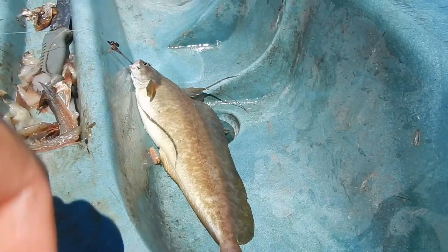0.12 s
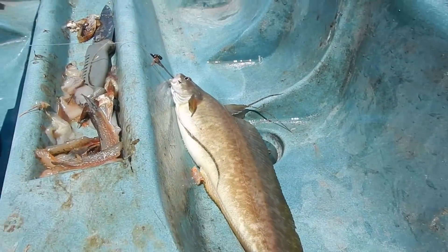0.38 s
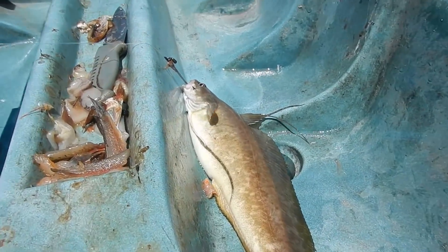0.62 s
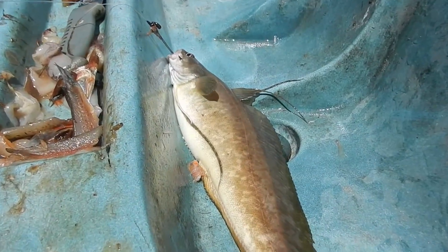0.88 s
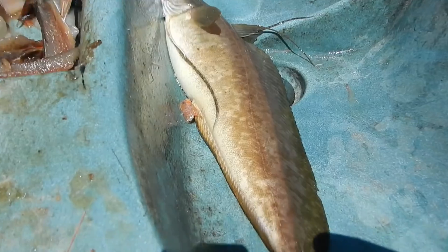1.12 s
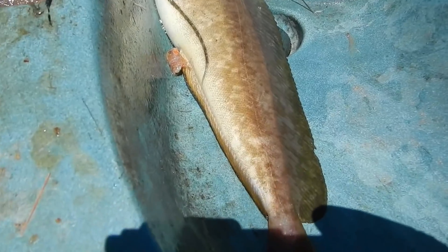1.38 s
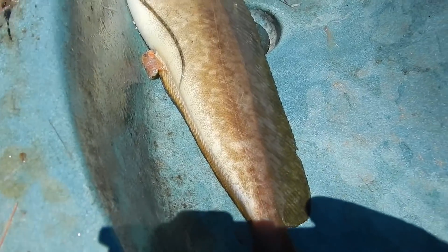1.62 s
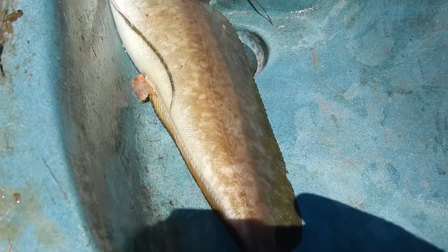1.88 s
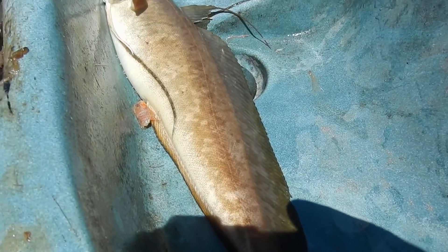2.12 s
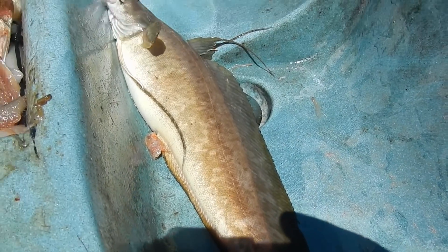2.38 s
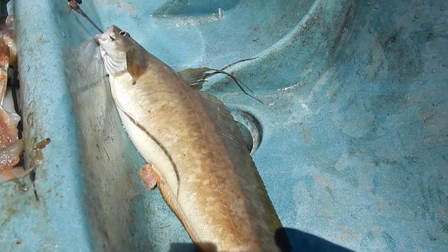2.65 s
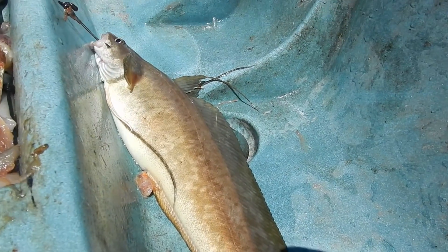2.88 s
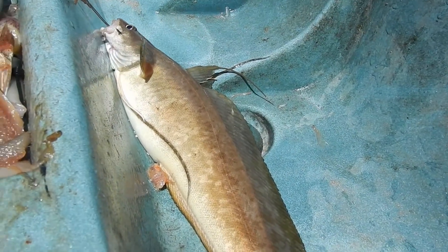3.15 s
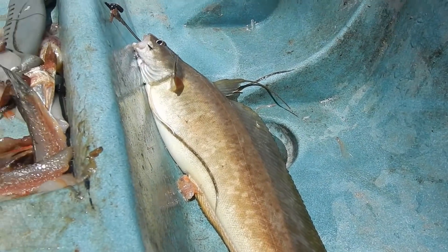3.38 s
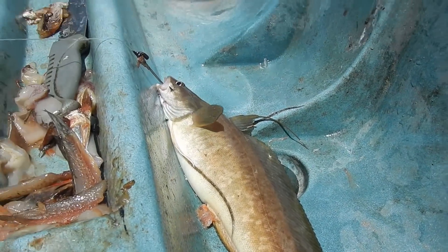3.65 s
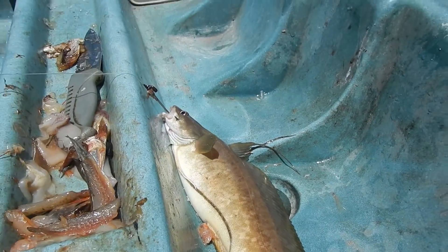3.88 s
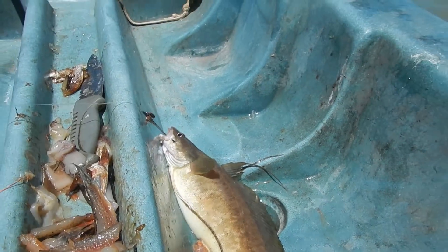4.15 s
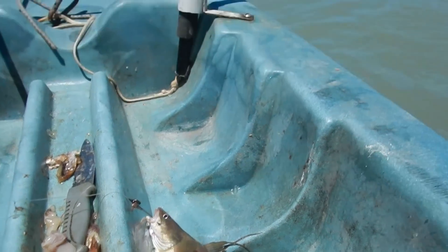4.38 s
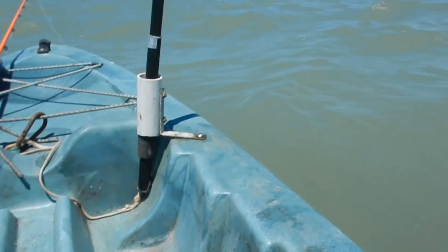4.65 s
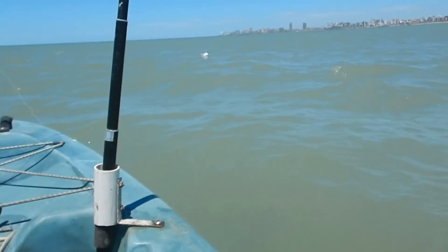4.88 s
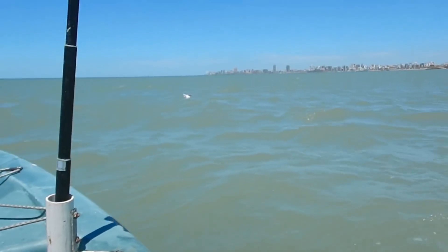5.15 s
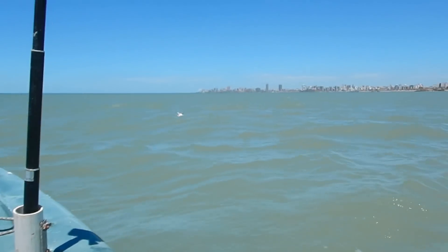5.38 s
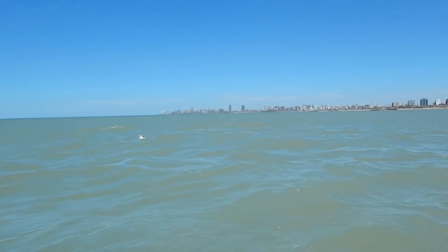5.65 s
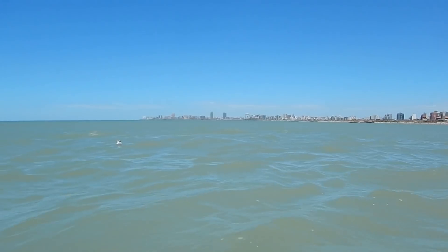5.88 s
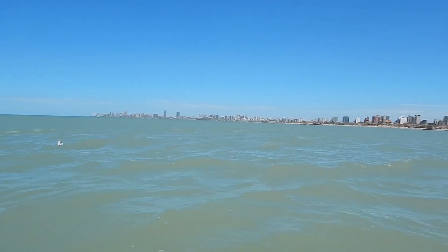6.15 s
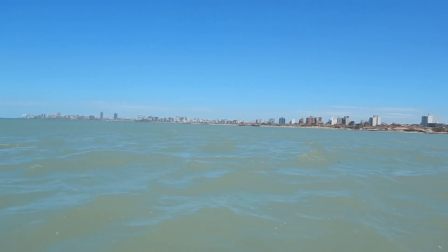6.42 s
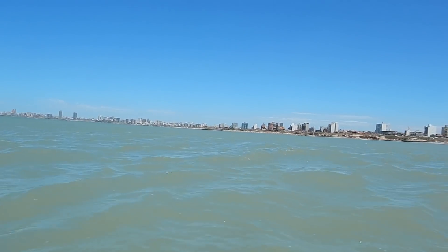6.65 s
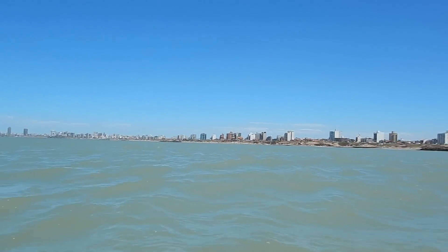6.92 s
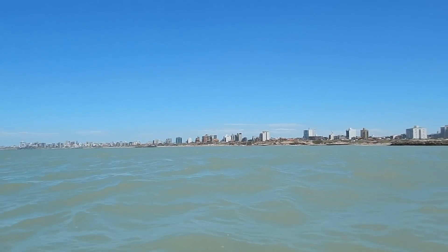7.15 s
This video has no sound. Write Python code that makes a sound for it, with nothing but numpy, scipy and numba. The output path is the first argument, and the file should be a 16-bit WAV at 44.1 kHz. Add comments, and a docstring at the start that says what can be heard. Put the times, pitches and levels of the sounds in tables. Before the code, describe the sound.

Outdoors on the sea, a small handheld stereo camera sits low in a plastic kayak. From 0 to 4 seconds it is quiet: a dull, surging swell rumble in the hull, faint trickle and light hiss, scattered tiny ticks. Soft hollow knocks come near 0.2, 0.3, 1.2 and 1.7, with a stronger double thud at 2.3 and more at 3.4 and 3.7. Pitched bubbles plop, clustering from 3.3 to 4. Around 4.4 a last low knock sounds and ticks thicken. From 4.7 sharp clicks and fizzy, gurgling splashes swell, leaning left. From 5 wind hits the microphones in irregular low buffets, rasps and thumping slaps, strongest about 5.1 to 6.4, shifting between sides. At 6.7 a loud, brief rising bubble plop joins another splash and slap; then wind weakens, leaving scattered gusts, wet ticks, wash and small plops until 7.3.

```python
"""A small camera in a plastic kayak on the open sea. At first swell rumbles in the hull and knocks on it (noise,
ringing hull modes), while water trickles, ticks and bubbles along the side (filtered noise, bursts, gliding tones).
Then the camera lifts out of shelter: the wash of fizz and gurgle grows, splashes and ticks crowd in, and wind
buffets, rasps and slaps at both microphone ports (gusty noise and short pushes) over a deep flutter of breeze."""
import sys
import numpy as np
from scipy import signal
from scipy.fft import rfft, irfft
from scipy.io import wavfile
from scipy.ndimage import uniform_filter1d, map_coordinates
from numba import njit

SR = 44100
rng = np.random.default_rng(int(sys.argv[2]) if len(sys.argv) > 2 else 0)


def put_to_file(sound):
    """Save the sound as 16-bit audio at rate SR, in the file named by the first command-line argument."""
    columns = np.atleast_2d(sound).T  # one column per channel
    safe = np.clip(columns, -1, 1)
    whole_steps = np.round(safe * 32767)
    wavfile.write(sys.argv[1], SR, whole_steps.astype(np.int16))


def undo_db(level):
    """Turn decibels back into plain size, where 20 dB means ten times bigger."""
    steps = np.asarray(level, float) / 20
    return 10 ** steps


N = 321048
T = np.arange(N) / SR

# Steady wind on the ports. Each row: time in seconds, level in dB.
STEADY_WIND = [(4.2, -71), (4.8, -50.5), (5.1, -26.5), (5.3, -34), (5.55, -27), (5.72, -31), (6, -25),
               (6.3, -35), (6.6, -29.5), (7, -38.5), (7.28, -30)]
# Gusts over the steady wind. Each row: centre in seconds, buffet level in dB, length in seconds.
GUSTS = [(4.91, -25, .042), (4.965, -23.5, 0.041), (5.037, -23.5, .099), (5.174, -19, 0.2),
         (5.24, -29, .02), (5.346, -22.5, 0.02), (5.413, -15.5, 0.031), (5.464, -16.5, 0.14),
         (5.517, -13.5, 0.033), (5.58, -15, 0.028), (5.63, -14.5, 0.077), (5.764, -22, 0.019),
         (5.818, -19, 0.042), (5.863, -20, 0.055), (5.962, -20.5, 0.13), (6.065, -13.5, 0.099),
         (6.166, -25, 0.089), (6.245, -23.5, 0.049), (6.352, -12, 0.082), (6.443, -22.5, 0.074),
         (6.509, -21.5, .029), (6.573, -27, .02), (6.67, -18, 0.05), (6.721, -25, 0.015),
         (6.772, -15.5, 0.019), (6.932, -23, 0.026), (7.085, -33.5, 0.059), (7.136, -20.5, 0.017),
         (7.187, -23, 0.018)]
# Tone of the low buffeting. Each row: frequency in Hz, relative gain in dB.
BUFFET_COLOUR = [(41, -50), (70, -16.5), (156, 6.5), (231, 2), (270, 1.5), (306, 1), (373, -2.5),
                 (600, -21), (780, -21), (1320, -120)]
# Tone of the brighter rasp. Each row: frequency in Hz, relative gain in dB.
RASP_COLOUR = [(250, -23), (450, 2.5), (800, -4), (1200, -9.5), (2000, -22.5), (3000, -33.5), (4500, -53)]
# Sharp slaps of wind. Each row: start in seconds, peak in dB before panning.
SLAPS = [(5.061, -12.5), (5.155, -4.5), (5.204, -12.5), (5.402, -18.5), (5.578, -12), (5.628, -4.5),
         (5.969, -10), (6.024, -14), (6.064, -8.5), (6.09, -15), (6.319, -7), (6.329, -6), (6.375, -5),
         (6.426, -14.5), (6.717, -14)]
# Deep flutter of the breeze. Each row: time in seconds, level in dB before its random wander.
BREEZE = [(0, -46.5), (.38, -42), (.69, -57), (1.64, -49), (1.74, -60), (2.13, -69), (2.41, -44.5),
          (3.85, -43.5), (4.1, -49), (4.45, -44), (4.62, -60), (5.21, -44), (5.49, -39), (5.74, -49.5),
          (5.9, -36.5), (7.28, -46)]
# Tone of the breeze. Each row: frequency in Hz, relative gain in dB.
BREEZE_COLOUR = [(15, -38.5), (30, -28.5), (50, -4), (75, -4), (100, -6.5), (140, -14.5), (250, -69.5)]
# Slow wash along the side. Each row: time in seconds, fizz level in dB, gurgle over fizz in dB.
WASH = [(0, -56.5, 4), (.55, -56, 4.5), (.94, -52.5, 2.5), (1.07, -62, 6.5), (1.7, -62.5, 6), (1.8, -56, 3),
        (2.1, -61.5, 5), (2.25, -67, 10), (2.62, -61.5, 4.5), (3.5, -64, 10), (3.97, -50.5, 3),
        (4.62, -48.5, 9.5), (4.87, -35, 0), (5.33, -32, -0.5), (5.62, -44.5, 7.5), (6.05, -46, 1.5),
        (6.2, -45, -4.5), (6.6, -49, 1.5), (6.77, -40, 0.5), (6.95, -34.5, 0), (7.01, -47.5, 3.5)]
# Wavelets breaking over the wash. Each row: centre in seconds, fizz in dB, length in seconds, gurgle over fizz in dB.
SPLASHES = [(0.172, -59.5, 0.017, 12), (0.339, -55, 0.066, 11.5), (1.459, -72, 0.053, 19),
            (1.73, -69.5, 0.043, 16), (1.999, -67.5, 0.054, 18), (2.306, -63, 0.11, 12),
            (2.918, -66.5, .08, 9.5), (3.276, -63, .04, 14), (3.388, -58, 0.069, 14.5),
            (3.521, -63, .08, 11.5), (3.731, -56, 0.12, 15), (4.714, -48, .08, -7),
            (5.069, -30, 0.036, -3.5), (5.208, -31.5, 0.11, 0.5), (5.445, -34, 0.073, -9),
            (5.817, -35.5, 0.15, -6), (6.69, -38, 0.091, 6)]
# Place of the wash in stereo. Each row: time in seconds, fizz left minus right in dB,
# delay of the fizz at the right port in samples, gurgle left minus right in dB.
BEARING = [(0, -2, 1.1, -5.5), (3.5, -2, 1.4, -7), (3.9, -3.5, 1.4, -7), (4.7, -10.5, 1.4, -2),
           (5.05, -7, 1.17, 0.5), (6, -6.5, 1.2, 0), (6.5, 0, .6, -1.5)]
# Tone of bursting foam. Each row: frequency in Hz, relative gain in dB.
FIZZ_COLOUR = [(2800, -15), (3300, -8.5), (3800, -25), (4400, -10), (5300, -1), (5700, -1), (7000, -10),
               (8500, -11.5), (11000, -16.5), (16000, -21.5)]
# Tone of the larger bubbles. Each row: frequency in Hz, relative gain in dB.
GURGLE_COLOUR = [(440, -33.5), (750, -4), (912, -7), (1050, -4), (1990, -2.5), (2480, -4.5), (2960, -8),
                 (3400, -18.5), (4000, -25.5), (5200, -38), (8800, -120)]
# Ticks of drops and gear. Each row: start in seconds, overall gain in dB, body gain in dB, snap gain in dB,
# the last two on top of the overall gain.
TICKS = [(0.1475, -37.5, 0, -9), (0.3165, -47, 8, -9), (0.381, -42, -6, -9), (0.7035, -39, 2, -9),
         (0.9367, -41, 6, -9), (1.1104, -53, 18.5, -9), (1.3708, -44, -2, -3), (1.6477, -38.5, 5, -8),
         (1.7595, -35, -5, -3), (1.7873, -35, -8, -9), (1.8554, -33, -3, -4), (2.276, -44, 2, -7),
         (3.4286, -47, 10, 2), (3.495, -47, 11, 4), (3.5326, -45, -2, -3), (3.665, -41, 12, -9),
         (3.8471, -31.5, -6, -9), (4.145, -29.5, -12, -9), (4.215, -29.5, -1, -10), (4.3222, -28, 4, -3),
         (4.4068, -28, -4, -9), (4.59, -29, -11, -9), (4.629, -32.5, -8, -9), (4.6752, -29, -14, -3),
         (4.7057, -23, -12, 2), (4.7306, -13, -19, -2), (4.78, -22, -20, -6), (4.8678, -19, -4, -12),
         (4.9117, -14, -14.5, -13), (4.9746, -13, -22, 2), (5.176, -17.5, -9, -12), (5.298, -12, -17, -12),
         (5.315, -9.5, -24, 3), (5.3258, -19, -17.5, 6.5), (5.408, -19, -13, -3), (5.4375, -13, -31, -7),
         (5.518, -20.5, -17.5, -12), (5.671, -24, -26, -8), (5.7002, -21.5, -17, -9),
         (5.7623, -21, -14, -8), (5.812, -13.5, -25, 2), (5.837, -16.5, -5, 4), (6.0222, -28, 4.5, 4),
         (6.178, -15, -9.5, -5), (6.195, -12.5, -6, -3), (6.2181, -21.5, -19.5, -4), (6.2296, -23, -3, -8),
         (6.2973, -26.5, -5, 8), (6.3162, -29, 1, 10.5), (6.439, -29.5, -19.5, -11),
         (6.548, -25.5, -20, -8), (6.608, -28, -1, -12), (6.686, -14.5, 4.5, 2), (6.72, -18.5, -12.5, 8),
         (6.738, -20, -16, -7), (6.7717, -33, -12.5, 12), (6.799, -21.5, -8, -2.5), (6.833, -18.5, -1, -6),
         (6.915, -17.5, -6, -9), (6.9445, -15, -3, -9), (7.001, -30, -12.5, 12.5), (7.0693, -30.5, -17, 10),
         (7.122, -24.5, -23, 7), (7.1348, -14.5, -11, -1.5)]
# Single bubbles. Each row: start in seconds, peak in dB before panning, first pitch in Hz, final over first pitch.
BUBBLES = [(.015, -46.5, 2830, 1.02), (0.074, -36.5, 1030, 1.05), (.088, -38.5, 2100, 1.2),
           (.15, -39, 2150, 1.1), (.3, -42, 1890, 1.2), (.567, -46, 1900, 1.2), (.698, -45, 1870, 1.1),
           (.148, -32.5, 1050, 0.93), (0.413, -34, 897, 0.66), (1.419, -32, 1180, 1.25),
           (1.425, -39.5, 1890, 0.66), (1.465, -46, 1900, 0.88), (1.73, -42, 2370, 1.05),
           (1.773, -36, 2440, 1.1), (1.854, -47, 2080, 1.02), (1.965, -46.5, 1880, 0.94),
           (2.893, -38, 1050, 0.94), (3.1, -45.5, 1350, 0.91), (3.2, -45, 1590, 1.1),
           (3.139, -38, 1344, 0.93), (3.332, -32.5, 1090, 0.92), (3.38, -33, 1500, 1.2),
           (3.395, -36, 2230, 0.91), (3.505, -46, 1350, 1.2), (3.535, -31.5, 740, 0.9),
           (3.553, -43, 1530, 1.01), (3.613, -30.5, 2420, 1.16), (3.716, -28, 1260, .83),
           (3.775, -41, 2970, 1.1), (3.786, -30.5, 1080, 1.3), (3.812, -33.5, 2000, 0.97),
           (3.904, -40, 2370, 0.92), (3.97, -44, 1880, 1.05), (4.294, -31, 1293, 0.84),
           (5.711, -28, 906, 1.7), (6.176, -24, 2300, 1.5), (6.539, -25.5, 854, 4), (6.688, -5, 1980, 1.5),
           (6.79, -24.5, 870, 4), (6.832, -26, 1493, 2), (6.926, -22, 1297, 1.1), (6.955, -31, 1900, 1.1),
           (7.13, -20, 934, 1.1)]
# Knocks on the hull. Each row: start in seconds, strength in dB, centre of the excited modes in Hz.
KNOCKS = [(.149, -32, 400), (.311, -28.5, 606), (1.195, -26.5, 500), (1.626, -36, 250), (1.739, -26.5, 347),
          (1.97, -32.5, 500), (2.274, -18, 335), (2.305, -27, 218), (2.893, -31.5, 895), (3.37, -33, 806),
          (3.402, -21.5, 460), (3.719, -21, 300), (4.341, -27, 500), (4.409, -21, 388)]
# Modes of the hull. Each row: frequency in Hz, relative strength in dB.
HULL = [(160, 11), (205, 6.5), (270, -10.5), (335, -7), (435, -4), (550, -3), (680, -4), (850, -42),
        (1050, -7)]
# Tone of the water thrown up by a knock. Each row: frequency in Hz, relative gain in dB.
SLOSH_COLOUR = [(300, -33.5), (600, 12.5), (1200, 4), (2400, -30.5), (4000, -30), (5500, -18.5),
                (8000, -66)]
# Swell in the hull. Each row: time in seconds, level in dB before its random surge.
SWELL = [(0, -35), (.57, -37), (1.39, -35), (2.74, -34.5), (3.58, -32.5), (4.13, -35), (4.37, -31),
         (4.75, -33.5)]
# Tone of the swell. Each row: frequency in Hz, relative gain in dB.
SWELL_COLOUR = [(35, -45), (60, -33.5), (129, -6.5), (219, 0.5), (304, -6), (428, -7), (789, -19.5),
                (990, -30.5), (1240, -30), (1800, -41.5), (2340, -59.5), (3960, -120)]
# Tone of the camera's hiss. Each row: frequency in Hz, relative gain in dB.
HISS_COLOUR = [(2000, -6.5), (4000, -1), (9000, -8.5), (12000, -10), (15500, -7.5)]
# Treble loss of the microphone. Each row: frequency in Hz, gain in dB.
MICROPHONE = [(6500, -0.5), (8000, -8.5), (9500, -17), (11000, -26), (13500, -37.5), (16000, -41)]
# Narrow bands taken out by the camera. Each row: centre in Hz, width in Hz.
NOTCHES = [(2500, 190), (5000, 60), (7500, 60)]

RASP_DB, RASP_FADE_DB_PER_S = -7, -4  # rasp over buffet in a gust at 5.5 s, dulling as the ports turn
GUST_PAN_DB, SLAP_PAN_DB = 4.5, 13  # random spread of left minus right
TICK_HZ, TICK_SPREAD = 5550, 0.046  # ring pitch and its spread in natural log
SNAP_FADE_S = 0.0056  # an extra 60 dB of fading for the bright first instant of contact
STRAY_TICK_DB, STRAY_SPREAD_DB = 11, 1.5  # lesser ticks: gain over the fizz and its spread
STRAY_BODY_DB, STRAY_SNAP_DB = -7.5, -3
BUBBLE_CYCLES, CYCLES_LOST_PER_DB = 43, 1.67  # ringing at -37 dB; hard plops are cut shorter
RISING_LASTS = .5  # power of the pitch rise by which a rising bubble rings longer
KNOCK_T60_S = 0.1  # at 300 Hz
HISS_DB = -71


def unit(x):
    """Scale to rms 1."""
    return x / np.sqrt(np.mean(x ** 2))


def colour(x, table, size=2048):
    """Causal minimum-phase filter through (Hz, dB) points, its phase taken from the folded cepstrum."""
    hz, db = np.transpose(table)
    f = np.maximum(np.arange(size // 2 + 1), 1e-3) * SR / size
    cepstrum = irfft(np.log(undo_db(np.interp(np.log(f), np.log(hz), db))))
    cepstrum[1:size // 2] *= 2
    cepstrum[size // 2 + 1:] = 0
    taps = irfft(np.exp(rfft(cepstrum)))
    taps = taps.reshape((1,) * (x.ndim - 1) + (-1,))
    return signal.fftconvolve(x, taps, axes=-1)[..., :x.shape[-1]]


def walk(rate):
    """Random levels held for 1 / rate seconds and slewed twice, scaled to rms 1."""
    hold = int(SR / rate)
    steps = np.repeat(rng.standard_normal(N // hold + 1), hold)
    return unit(uniform_filter1d(uniform_filter1d(steps, hold), hold)[:N])


def curves(rows):
    """Columns of (seconds, value, ..) rows, drawn as lines at every sample."""
    s, *columns = np.transpose(rows)
    return [np.interp(T, s, column) for column in columns]


def pan(db):
    """Left and right gains for a left-minus-right level difference."""
    return undo_db(np.array([db, -db]) / 2)


def pair(alike):
    """Two noises that share the given part of their power."""
    both, left, right = rng.standard_normal((3, N))
    alike = np.clip(alike, 0, 1)
    return np.sqrt(alike) * both + np.sqrt(1 - alike) * np.array([left, right])


def bump(s, length):
    """A smooth rise and fall of power around a moment."""
    near = slice(max(int((s - .2) * SR), 0), int((s + .2) * SR))
    out = np.zeros(N)
    out[near] = np.exp(-((T[near] - s) / (0.34 * length)) ** 2)
    return out


@njit
def rings(n, rows, hold):
    """Damped tones (s, Hz, t60 s, final over first pitch, rise s, left, right); hold over 1 delays the fading."""
    out = np.zeros((2, n))
    for s, hz, t60, glide, rise, left, right in [(r[0], r[1], r[2], r[3], r[4], r[5], r[6]) for r in rows]:
        start, phase, count = int(s * SR), 0., int(t60 * SR)
        for i in range(max(0, -start), min(count, n - start)):
            phase += 2 * np.pi * hz * glide ** (i / count) / SR
            fade = 1e-3 ** ((i / count) ** hold)
            attack = np.sin(np.pi / 2 * min(i / (rise * SR), 1.)) ** 2
            v = np.sin(phase) * fade * attack
            out[0, start + i] += left * v
            out[1, start + i] += right * v
    return out


def wind():
    """Eddies cross each port almost on their own; the rasp rides on the crests of the buffets."""
    steady_db, = curves(STEADY_WIND)
    steady = undo_db(2 * steady_db)
    puffs = np.zeros((2, N))
    for s, db, length in GUSTS:
        side = pan(2 * GUST_PAN_DB * rng.standard_normal())[:, None]  # doubled, as it scales power
        puffs += undo_db(2 * db) * bump(s, length) * side
    buffet_power = steady + puffs
    rasp_db = RASP_DB + RASP_FADE_DB_PER_S * (T - 5.5)
    rasp_power = undo_db(2 * -8.) * steady + undo_db(2 * rasp_db) * puffs
    flutter = undo_db(2.6 * np.array([walk(45.), walk(45.)]))
    buffet = unit(colour(flutter * pair(0.072), BUFFET_COLOUR))
    rasp = unit(colour((0.35 + np.abs(buffet) ** 2.0) * pair(0), RASP_COLOUR))
    # levels are for the mean of the ports: unrelated ports mix to 3 dB under either one
    return np.sqrt(2 * buffet_power) * buffet + np.sqrt(2 * rasp_power) * rasp


def slaps():
    """Each slap is one quick push of air and its slower rebound, of either sign at each port."""
    out, t = np.zeros((2, N)), np.arange(512) / SR
    swing = np.sin(2 * np.pi * 480 * t * np.exp(-t / 0.0071))
    push = swing * np.exp(-t / 0.0011) * (1 - np.exp(-(t / 0.00076) ** 2))
    push /= push.max()
    for s, peak_db in SLAPS:
        sign = np.sign(rng.standard_normal((2, 1)))
        side = pan(SLAP_PAN_DB * rng.standard_normal())[:, None]
        i = int(s * SR)
        out[:, i:i + len(t)] += undo_db(peak_db) * side * sign * push
    return out


def wash_levels():
    """Fizz and gurgle in dB: the slow wash with the power of the splashes on top."""
    fizz_db, over_db = curves(WASH)
    power = undo_db(2 * np.array([fizz_db, fizz_db + over_db]))
    for s, db, length, gurgle_db in SPLASHES:
        power += undo_db(2 * np.array([[db], [db + gurgle_db]])) * bump(s, length)
    return 10 * np.log10(power)


def froth(rate, low_hz, octaves, cycles, spread_db, pan_db):
    """A crowd of small rising-pitched bubbles, mostly faint and a few strong, each from its own direction."""
    at, pitch, size, side = rng.random((int(rate * N / SR), 4)).T
    s = at * N / SR
    hz = low_hz * 2 ** (octaves * pitch)
    left, right = undo_db(-spread_db * np.log(1.01 - size)) * pan(pan_db * (2 * side - 1))
    rows = np.transpose([s, hz, cycles / hz, 1.324 + 0 * hz, 1.9 / hz, left, right])
    return unit(rings(N, rows, 1.))


def wash():
    """Fine fizz of bursting foam over the gurgle of larger bubbles."""
    fizz_db, gurgle_db = wash_levels()
    fizz_pan_db, late, gurgle_pan_db = curves(BEARING)
    # faint, far water is mostly a smooth hiss; loud, near water breaks up into single bubbles
    near = np.clip((fizz_db + 68) / 26, .15, 1)
    foam = pair(0.19 + 0.34 * near) * undo_db(near * walk(30.))
    foam += 0.82 * near * froth(900., 3500.0, 1.51, 22., 3.9, 4.)
    # the foam reaches the left port a little sooner
    foam[1] = map_coordinates(foam[1], [np.arange(N) - late], mode="mirror")
    fizz = unit(colour(foam, FIZZ_COLOUR))
    lively = np.clip((gurgle_db + 64) / 18, .15, 1)
    lapping = undo_db(3.6 * walk(15.0)) * pair(0.87)
    lapping += 0.69 * lively * froth(350., 690.0, 2.244, 26.0, 1.46, 3.8)
    # the gurgle reaches the right port one sample sooner
    lapping[0] = np.roll(lapping[0], 1)
    gurgle = pan(gurgle_pan_db) * unit(colour(lapping, GURGLE_COLOUR))
    return undo_db(fizz_db) * pan(fizz_pan_db) * fizz + undo_db(gurgle_db) * gurgle


def ticks():
    """A short burst panned with the fizz: a sharp top ringing at its own pitch, a duller body and a bright snap."""
    out, t = np.zeros((2, N + 1024)), np.arange(1024) / SR
    pan_db = curves(BEARING)[0]
    # lesser ticks fall at random, thicker in lively water and louder with the fizz around them
    fizz_db = wash_levels()[0]
    busy = np.cumsum(undo_db(fizz_db / 3))
    at = np.interp(rng.random(40), busy / busy[-1], T)
    stray_db = np.interp(at, T, fizz_db) + STRAY_TICK_DB + STRAY_SPREAD_DB * rng.standard_normal(40)
    strays = [(s, db, STRAY_BODY_DB, STRAY_SNAP_DB) for s, db in zip(at, stray_db)]
    for s, gain_db, body_db, snap_db in TICKS + strays:
        hz = TICK_HZ * np.exp(TICK_SPREAD * rng.standard_normal())
        burst = rng.standard_normal(len(t)) * 0.00066 ** (t / 0.023)
        ring = signal.lfilter(*signal.iirpeak(hz, 5., fs=SR), burst)
        top = colour(burst, FIZZ_COLOUR, size=256)
        body = colour(burst, GURGLE_COLOUR, size=256)
        snap = np.diff(burst * 1e-3 ** (t / SNAP_FADE_S), prepend=0)
        shares = [.65, .5, undo_db(body_db), undo_db(snap_db)]
        tick = sum(share * part / np.abs(part).max() for share, part in zip(shares, [ring, top, body, snap]))
        i = int(s * SR)
        both = np.array([tick, np.roll(tick, 1)])  # one sample later at the right
        out[:, i:i + len(t)] += undo_db(gain_db) * pan(pan_db[i])[:, None] * both
    return out[:, :N]


def bubbles():
    """Single bubbles ring for some cycles, right of centre; those that rise to the surface sing higher."""
    s, peak_db, hz, glide = np.transpose(BUBBLES)
    cycles = np.clip(BUBBLE_CYCLES - CYCLES_LOST_PER_DB * (peak_db + 37), 8, 80)
    t60 = cycles * glide ** RISING_LASTS / hz
    left, right = undo_db(peak_db) * pan(-4.0)[:, None]
    return rings(N, np.transpose([s, hz, t60, glide, 1.5 / hz, left, right]), 2.)


def knocks():
    """Every blow shakes the hull modes near its own pitch, the higher dying sooner, and throws up a slosh of water."""
    hz, db = np.transpose(HULL)
    rows, slosh = [], np.zeros(N)
    same = np.ones(len(hz))
    t60 = KNOCK_T60_S * (300 / hz) ** 0.44
    for s, peak_db, centre_hz in KNOCKS:
        late, off = rng.standard_normal((2, len(hz)))
        gain = undo_db(db - 17.0 * np.log2(hz / centre_hz) ** 2)
        gain = undo_db(peak_db) * gain / np.sqrt(np.sum(gain ** 2))
        start, pitch = s + 0.00304 * np.abs(late), hz * (1 + .02 * off)
        rows += list(np.transpose([start, pitch, t60, same, 0.0021 * same, gain, gain]))
        rise = np.clip((T - s) / 0.0094, 0, 1)
        fade = 0.0012 ** (np.abs(T - s) / (2.42 * KNOCK_T60_S))
        slosh += undo_db(peak_db) * centre_hz / 400 * rise * fade
    water = unit(colour(pair(0.97), SLOSH_COLOUR))
    return rings(N, np.array(rows), 1.38) + undo_db(-10.5) * slosh * water


def swell():
    """Water working along the hull: a dull, surging rumble, nearly the same at both ports."""
    level_db, = curves(SWELL)
    surge_db = 1.5 * walk(14.)
    return undo_db(level_db + surge_db) * unit(colour(pair(0.98), SWELL_COLOUR))


def breeze():
    """Deep flutter of moving air: low noise, largely shared by the ports, that wanders in level."""
    level_db, = curves(BREEZE)
    wander_db = 1.3 * walk(6.2)
    return undo_db(level_db + wander_db) * unit(colour(pair(0.74), BREEZE_COLOUR))


def scene():
    """All sources at the two ports."""
    return wind() + slaps() + wash() + ticks() + bubbles() + knocks() + swell() + breeze()


def band_limit(x):
    """A steep low-pass at the top of the band."""
    return signal.sosfilt(signal.butter(12, 15830, fs=SR, output="sos"), x)


def record(dry):
    """The camera thins the deep bass, rounds loud peaks, dulls the top, adds hiss and notches out narrow bands."""
    x = signal.sosfilt(signal.butter(1, 45, "high", fs=SR, output="sos"), dry)
    x = np.tanh(x)
    x = colour(x, MICROPHONE, size=256)
    x = x + undo_db(HISS_DB) * unit(colour(pair(0), HISS_COLOUR))
    for hz, width in NOTCHES:
        x = signal.lfilter(*signal.iirnotch(hz, hz / width, fs=SR), x)
    return band_limit(x)


dry = scene()
out = record(dry)
put_to_file(out)
```